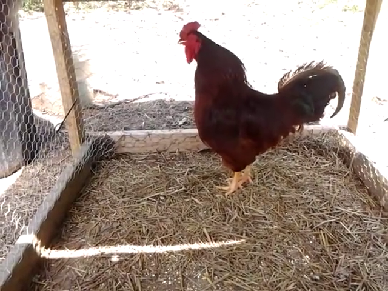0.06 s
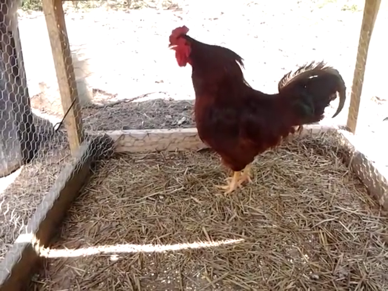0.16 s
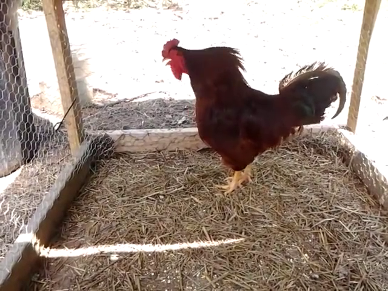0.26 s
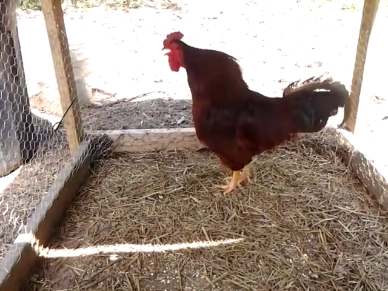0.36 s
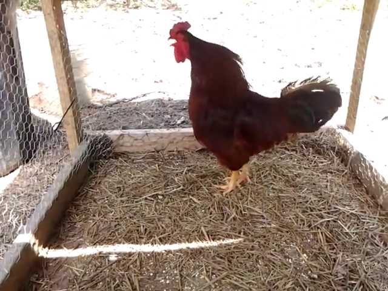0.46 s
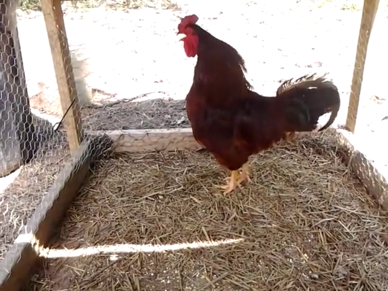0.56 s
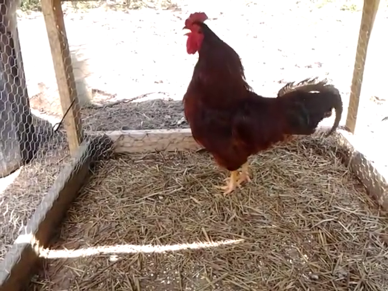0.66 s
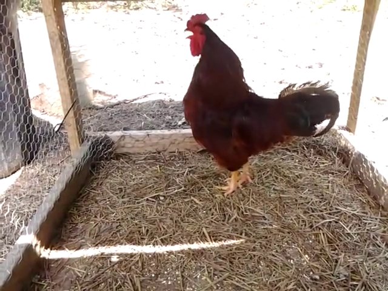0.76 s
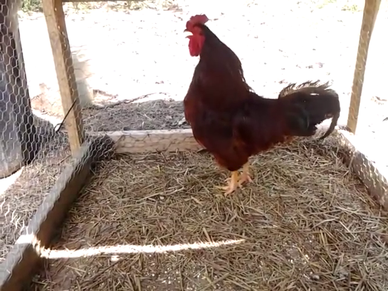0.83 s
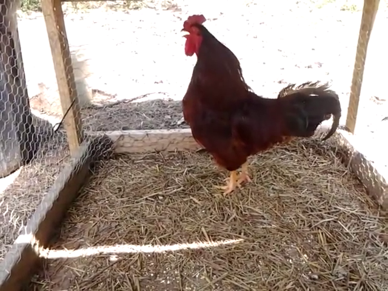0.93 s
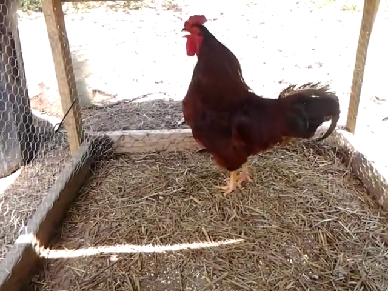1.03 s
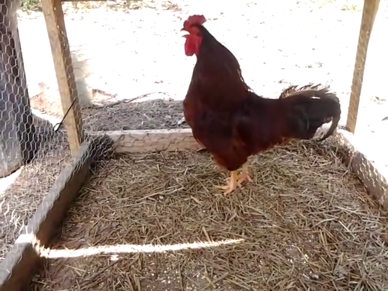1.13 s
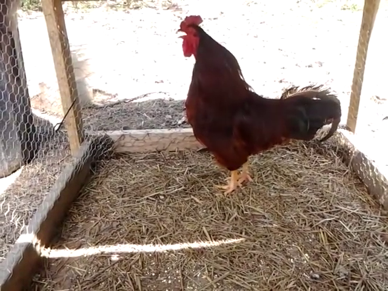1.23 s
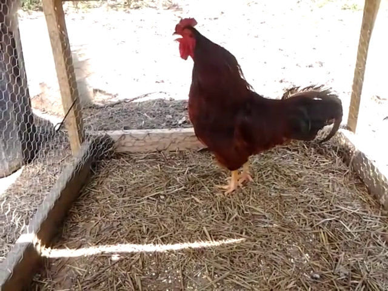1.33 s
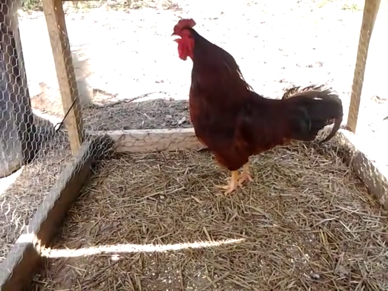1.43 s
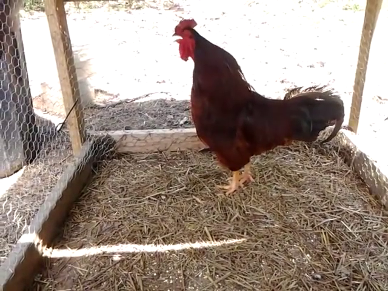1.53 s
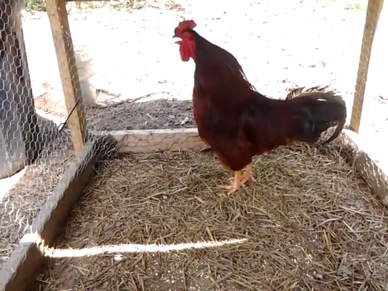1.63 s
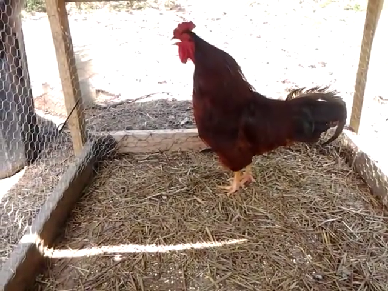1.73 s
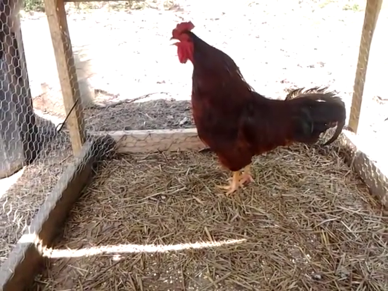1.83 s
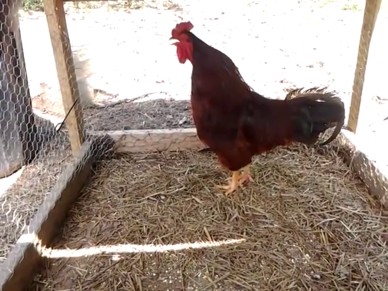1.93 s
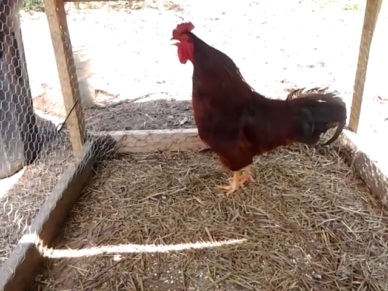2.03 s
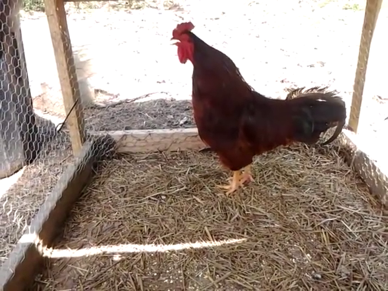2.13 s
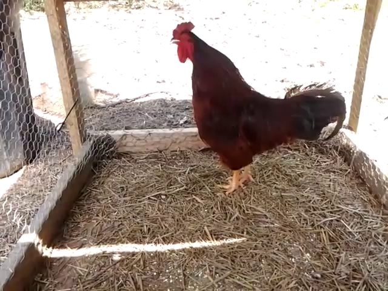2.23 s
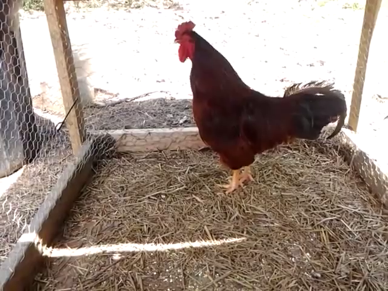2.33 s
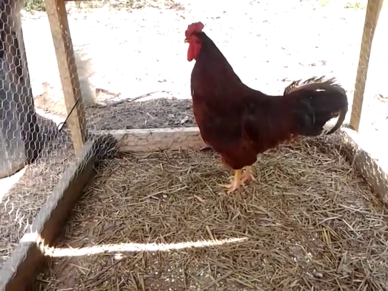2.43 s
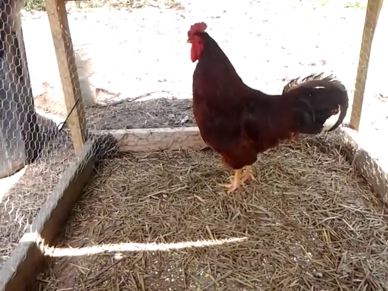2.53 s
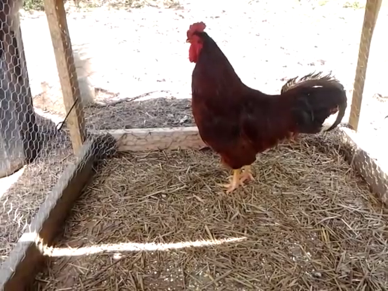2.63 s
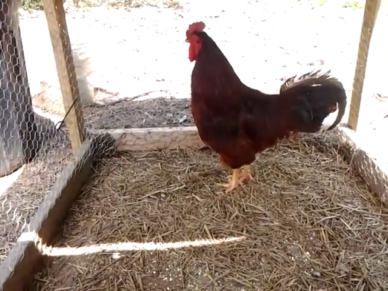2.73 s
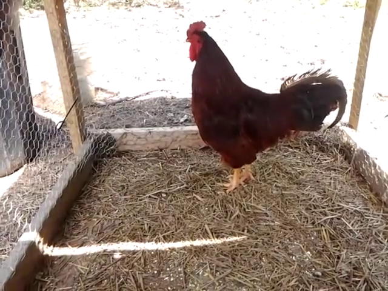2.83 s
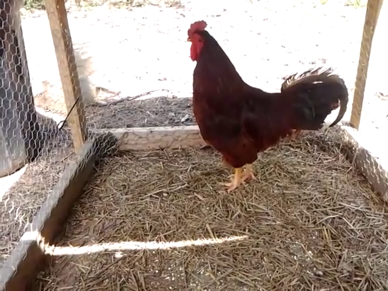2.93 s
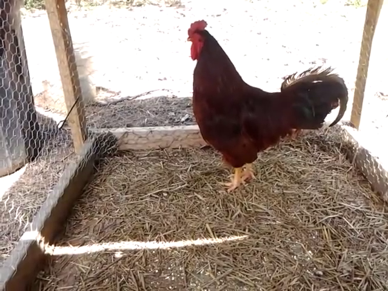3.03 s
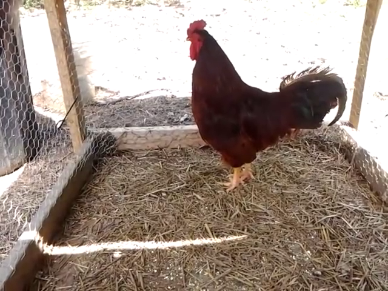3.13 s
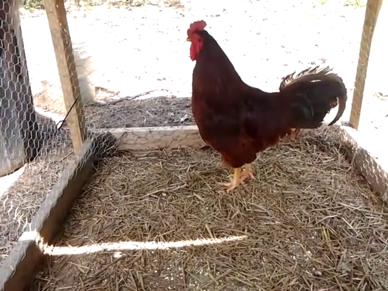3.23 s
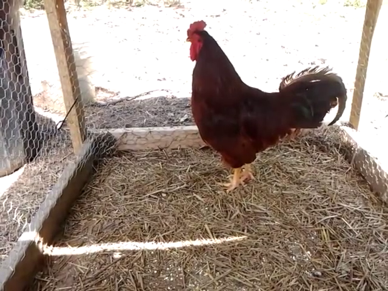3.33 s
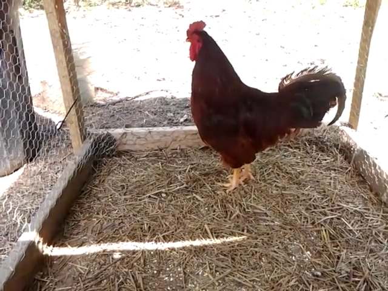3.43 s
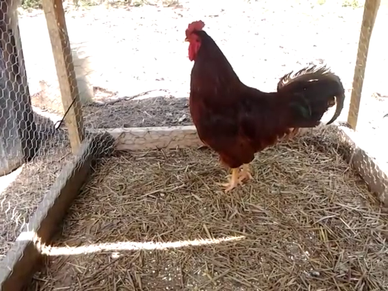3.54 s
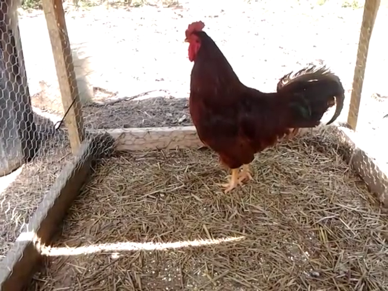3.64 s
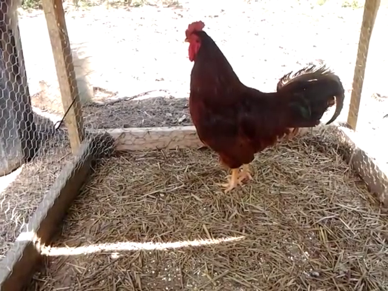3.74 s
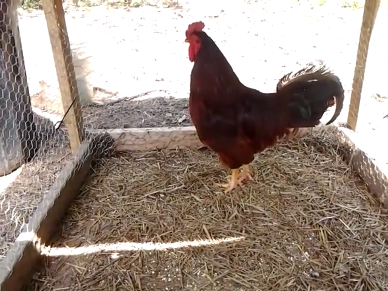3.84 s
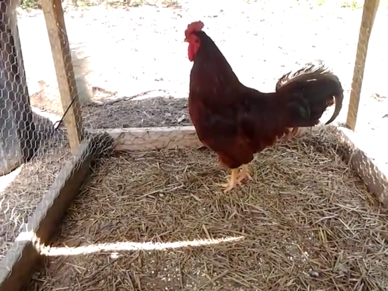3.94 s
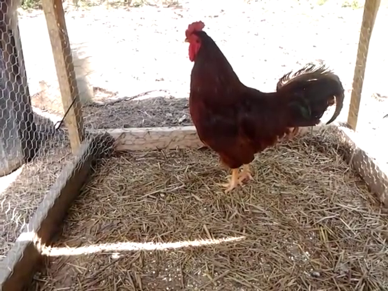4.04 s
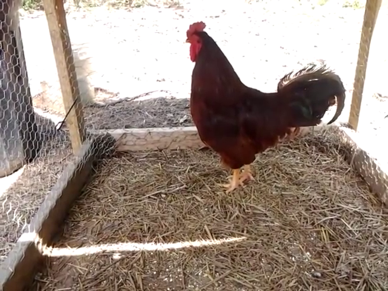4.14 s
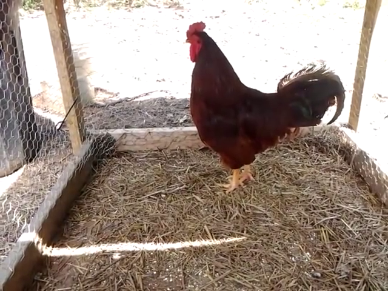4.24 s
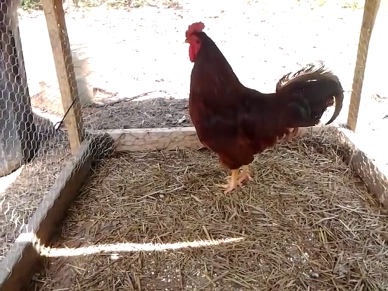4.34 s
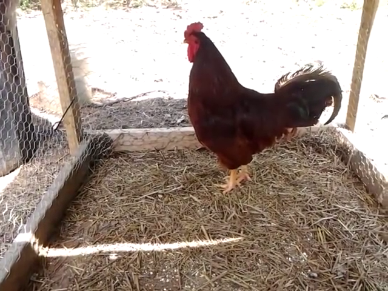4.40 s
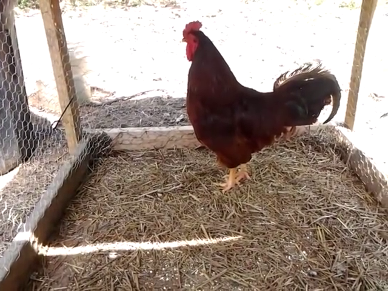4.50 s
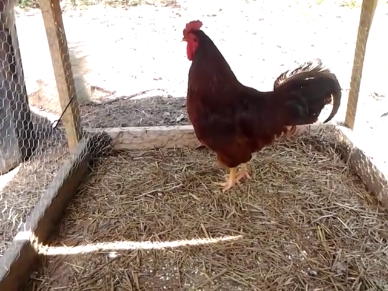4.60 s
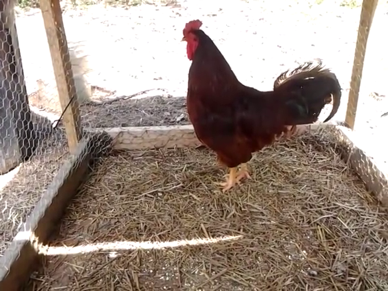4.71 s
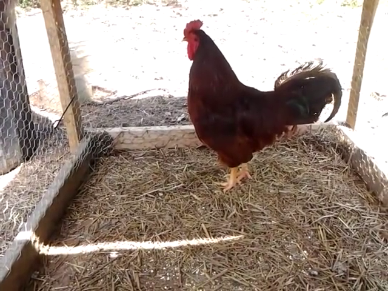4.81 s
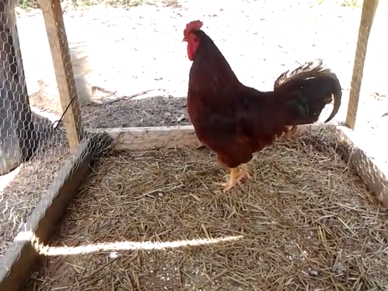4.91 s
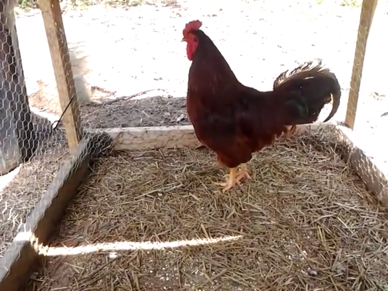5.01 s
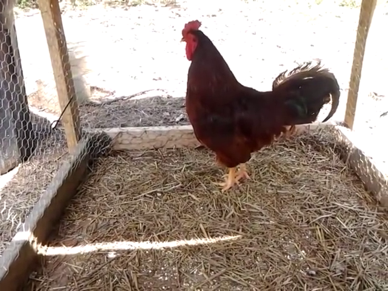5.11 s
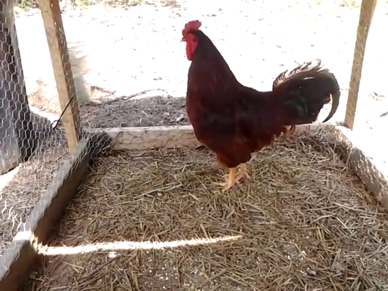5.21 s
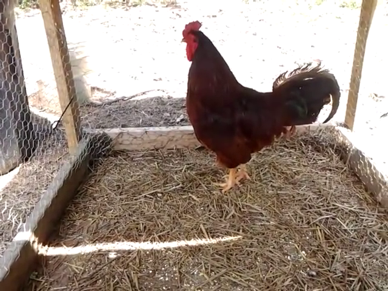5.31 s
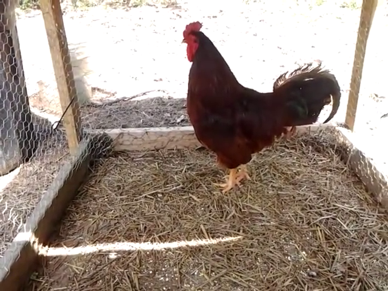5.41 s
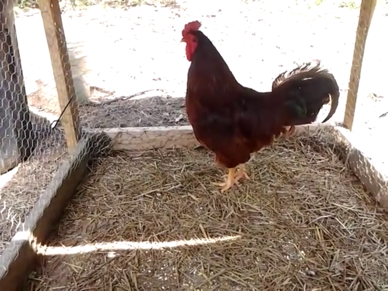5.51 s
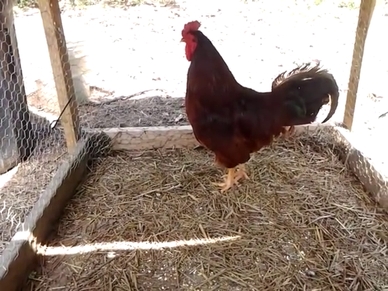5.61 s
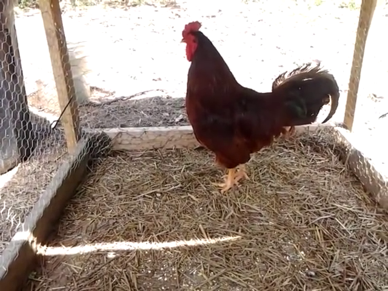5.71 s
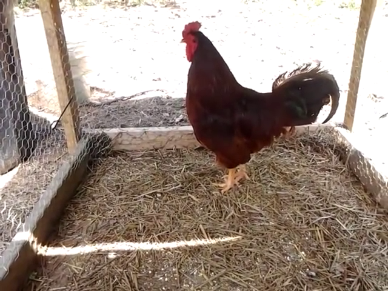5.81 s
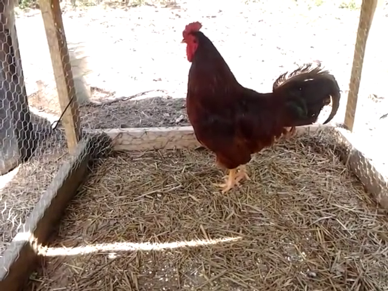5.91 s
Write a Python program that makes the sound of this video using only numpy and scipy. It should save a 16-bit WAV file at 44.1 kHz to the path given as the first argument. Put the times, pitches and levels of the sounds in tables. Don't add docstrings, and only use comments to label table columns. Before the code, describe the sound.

In a quiet outdoor pen, sparrows chirp and straw ticks before a close rooster gives one loud crow: a short hoarse note, a brief gap, a cracking rise, a rapid flutter and a long sinking note. Echoes fade into far whistles, chirps and faint clucks; later wings rustle softly and a crow caws three times. A small hissy microphone clips on the peaks.

```python
import sys
import numpy as np
from scipy import signal
from scipy.fft import rfft, irfft
from scipy.io import wavfile
from scipy.ndimage import uniform_filter1d

SR = 44100
rng = np.random.default_rng(int(sys.argv[2]) if len(sys.argv) > 2 else 0)


def generate_wav(sig):
    pcm = np.round(np.clip(np.atleast_2d(sig).T, -1, 1) * 32767).astype(np.int16)
    wavfile.write(sys.argv[1], SR, pcm)


def volts_from_db(level):
    exponent = np.asarray(level, float) / 20
    return 10 ** exponent


N = 262836


def evened(x):
    return x / np.sqrt(np.mean(x ** 2) + 1e-20)


def read(points, hz):
    f, value = np.transpose(points)
    return np.interp(np.log(hz + 1), np.log(f + 1), value)


def follow(t, rows):
    s, *columns = np.transpose(rows)
    return [np.interp(t, s, column) for column in columns]


def add(mix, s, sound):
    part = mix[round(s * SR):][:len(sound)]
    part += sound[:len(part)]


def drift(hz, step=1):
    lowpass = signal.butter(2, hz, fs=SR / step, output="sos")
    return evened(signal.sosfilt(lowpass, rng.standard_normal(N // step + 1)))


def response(modes, hz):
    return np.sqrt(sum((volts_from_db(db) / (1 + (1.7 * (hz - f) / w) ** 2) ** 1.5) ** 2 for f, w, db in modes))


def chaos(modes, lo_hz, hi_hz, beats):
    hz = np.fft.rfftfreq(N, 1 / SR)
    band = 1 / (1 + (lo_hz / (hz + 1)) ** 8) / (1 + (hz / hi_hz) ** 8)
    noise = beats * rng.standard_normal(N)
    return evened(irfft(rfft(noise) * response(modes, hz) * band, N))


# f/Hz, level/dB per Hz
AIR = [(12, -34), (20, -7), (48, -15.5), (157, -2.5), (268, -2), (398, -5), (574, -4.5), (1070, -8.5),
       (1680, -6.5), (2780, -9.5), (3910, -9), (5800, -16.5), (8600, -5.5), (10500, -10.5), (16900, -7.5)]
AIR_DB = -56.5
# t/s, level/dB
LULL = [(0, 0.5), (2.6, 2.5), (3.3, 0), (3.95, -1.5), (4.2, -0.5), (4.5, 0.5), (5.2, 2.5), (5.6, -3),
        (5.96, 2)]


def air():
    hop = 256
    frames, hz = N // hop + 5, np.fft.rfftfreq(1024, 1 / SR)
    a, b, patches = rng.standard_normal((frames, 513, 3)).T
    patches = evened(uniform_filter1d(uniform_filter1d(patches, 14, 0), 10, 1))
    at = np.arange(frames) * hop
    swell_db = .5 * np.interp(at, np.arange(N + 1), drift(4.7))
    patch_db = (.8 + 1.6 * (hz < 400))[:, None] * patches
    z = (a + 1j * b) * volts_from_db(read(AIR, hz)[:, None] + patch_db + swell_db + follow(at / SR, LULL)[0])
    return volts_from_db(AIR_DB) * evened(signal.istft(z, nperseg=1024, noverlap=768)[1][:N])


# f/Hz, t60/s
YARD = [(300, 0.5), (700, 0.4), (1300, 0.8), (2500, 1.1), (4500, 0.27), (10000, 0.32)]


def tail(x, gap_s):
    taps = np.zeros(SR)
    at = np.arange(round(gap_s * SR), SR - 20, 20)
    at = at + rng.integers(0, 20, len(at))
    taps[at] = rng.choice([-1., 1.], len(at))
    hz, t, z = signal.stft(taps, SR, nperseg=256)
    decay = volts_from_db(-60 * t / read(YARD, hz)[:, None])
    taps = signal.istft(z * decay, SR, nperseg=256)[1]
    return signal.fftconvolve(x, taps / np.linalg.norm(taps))[:N]


# f/Hz, width/Hz, level/dB
ECHO_COLOUR = [(670, 580, -18.5), (1400, 460, -5.5), (3900, 3100, -7), (6100, 600, -8.5),
               (8700, 1500, -2.5)]


def yard_echoes(bird, whistler, neighbours, caws):
    colour = response(ECHO_COLOUR, np.fft.rfftfreq(N, 1 / SR))
    thrown = irfft(rfft(np.roll(bird, round(0.128 * SR))) * colour, N)
    early = np.roll(thrown, -round(0.12 * SR))
    send = volts_from_db(-28.0) * thrown + volts_from_db(-36.0) * early
    send = send + volts_from_db(-4.5) * whistler + volts_from_db(-7.5) * neighbours + volts_from_db(-11.0) * caws
    echoes = tail(send, 0.014)
    return np.interp(np.arange(N) + 5 * drift(14)[:N], np.arange(N), echoes)


# t/s, level/dB
RUSTLE = [(4.25, -76), (4.35, -61), (4.503, -55), (4.656, -69), (4.684, -76), (4.694, -69), (4.719, -65)]


def rustle():
    s, db = np.transpose(RUSTLE)
    level_db = np.interp(np.arange(N) / SR, s, db, left=-120, right=-120) - 5.0
    return volts_from_db(level_db) * chaos([(3430, 670, 0)], 2500, 4400, 1)


# t/s, length/s, first f/Hz, level/dB
SPARROWS = [(0, 0.04, 4500, -67), (0.141, 0.04, 4700, -67), (0.315, 0.088, 4400, -58.5),
            (2.362, 0.051, 5080, -64), (2.482, 0.046, 4870, -61), (2.611, 0.024, 4625, -58),
            (2.687, 0.028, 3627, -66), (2.935, 0.051, 4950, -66.5), (3.065, 0.05, 4900, -64),
            (3.175, 0.04, 4100, -73), (3.289, 0.054, 4300, -68), (3.421, 0.028, 4470, -62.5),
            (3.473, 0.051, 4790, -64.5), (3.609, 0.0176, 4400, -61.5), (3.674, 0.054, 4130, -65),
            (3.795, 0.036, 4300, -64), (4.181, 0.037, 4850, -62), (4.292, 0.03, 4635, -65),
            (5.674, 0.022, 4300, -76), (5.77, 0.024, 4370, -65.5)]
SPARROW_FALL = 0.43
# t/s, length/s, f/Hz, level/dB
PEEPS = [(0.324, 0.18, 2515, -56), (2.44, 0.096, 3520, -61), (2.498, 0.17, 3675, -64),
         (2.522, 0.17, 4180, -66), (2.812, 0.03, 3960, -65), (3.158, 0.029, 3970, -63),
         (4.978, 0.015, 3660, -50.5), (4.978, .012, 4080, -49.5), (5.78, 0.031, 3100, -55.5),
         (3.779, 0.016, 4470, -60.5), (4.142, 0.038, 2323, -64.5), (4.327, 0.37, 4163, -62.5),
         (4.905, 0.053, 2960, -59.5), (4.921, 0.044, 3960, -58), (5.055, 0.037, 3117, -52.5)]
# t/s, length/s, level/dB
CLUCKS = [
    (.23, 0.072, -64),
    (2.59, 0.04, -54.5),
    (4.749, 0.0442, -66),
    (5.5, 0.056, -61),
]
CLUCK_HZ, CLUCK_TOP_HZ = 749, 970
# t/s, first note f/Hz, level/dB, wait/s
WHISTLES = [
    (2.368, 2710, -57.5, 0.053),
    (2.696, 2653, -53, .052),
    (2.995, 2542, -55, .052),
    (4.675, 1800, -62, .035),
]
NOTE_S, DROP_S, DROP_HZ, LAND_HZ = 0.048, 0.083, 2196, 1783


def chirps():
    rows = [(s, length, hz, SPARROW_FALL * hz, db) for s, length, hz, db in SPARROWS]
    rows += [(s, length, hz, hz, db) for s, length, hz, db in PEEPS]
    rows += [(s, length, CLUCK_HZ, CLUCK_TOP_HZ, db) for s, length, db in CLUCKS]
    rows += [(s, NOTE_S, hz, .97 * hz, db) for s, hz, db, wait in WHISTLES]
    rows += [(s + wait, DROP_S, DROP_HZ, LAND_HZ, db) for s, hz, db, wait in WHISTLES]
    return rows


def small_birds(lo_hz, hi_hz):
    out, waver = np.zeros(N), drift(150)
    for s, length, start_hz, end_hz, db in chirps():
        if not lo_hz < start_hz <= hi_hz:
            continue
        u = np.linspace(0, 1, round(length * SR))
        glide = start_hz + (end_hz - start_hz) * u ** 1.6
        glide = glide * (1 + 0.016 * waver[round(s * SR):][:len(u)])
        swell = np.sqrt(2) * np.sin(np.pi * u ** 0.6)
        add(out, s, volts_from_db(db) * swell * np.sin(2 * np.pi * np.cumsum(glide) / SR))
    return out


# t/s, length/s, top f/Hz, level/dB, swell from the start/dB
CAWS = [
    (4.306, 0.24, 807, -53, -2.5),
    (5.058, .24, 804, -46.5, 7.5),
    (5.771, 0.27, 813, -51, -5.5),
]
CAW_PARTIALS = [(2, -3), (3, -0.5), (4, -4.5), (5, -11.5), (6, -11.5)]
CAW_ARCH, CAW_SAG = .04, .03
CAW_SCATTER_DB, CAW_PATCHY_DB = 3.5, 1


def crow():
    out, wobble, rattle = np.zeros(N), drift(68), drift(33)
    patchy = volts_from_db(CAW_PATCHY_DB * drift(20))
    breath = chaos([(2320, 3200, 5.0), (3700, 1400, -5.0), (9790, 2000, 4)], 280, 12000, 1)
    for s, length, hz, db, swell_db in CAWS:
        u = np.linspace(0, 1, round(length * SR))
        at = np.minimum(round(s * SR) + np.arange(len(u)), N - 1)
        arch = 1 - CAW_ARCH * (1 - np.sin(np.pi * u ** .6)) + CAW_SAG * (.4 - u)
        phase = 2 * np.pi * np.cumsum(hz * arch * (1 + 0.012 * wobble[at])) / SR
        chop = 1 + .75 * np.cos(2 * np.pi * np.cumsum(115 * (1 + .13 * rattle[at])) / SR)
        partials = sum(volts_from_db(level_db + CAW_SCATTER_DB * drift(5.8)[at]) * np.cos(k * phase)
                       for k, level_db in CAW_PARTIALS)
        caw = evened((partials + 0.38 * breath[at]) * chop * patchy[at])
        add(out, s, volts_from_db(db - swell_db * (1 - u) ** 2) * caw * signal.windows.tukey(len(u), .3))
    return out


# t/s, level/dB
TICKS = [(0.2229, -46.5), (0.2493, -41), (0.2658, -35), (0.2982, -34), (3.6103, -43.5), (4.1411, -54),
         (4.9318, -51), (5.069, -46.5), (5.1728, -45), (5.4411, -57.5), (5.6686, -54)]
# t/s, level/dB
PUFFS = [
    (0.384, -44.5),
    (0.404, -42.5),
    (0.431, -44.5),
    (0.451, -45),
    (0.693, -32.5),
    (0.72, -34),
    (1.184, -39),
    (1.284, -26),
    (1.448, -45),
]


def close_noises():
    out, t = np.zeros(N), np.arange(2000) / SR
    for s, db in TICKS:
        add(out, s, volts_from_db(db - 60 * t / 0.0095) * np.sin(2 * np.pi * 8700 * t))
    for s, db in PUFFS:
        add(out, s, volts_from_db(db) * t / 0.013 * np.exp(1 - t / 0.0023))
    return out


# t/s, effort level/dB, strain/dB
OPENING = [
    [(.353, -25.5, -1), (.364, -13, -1.5), (.382, -11.5, -3.5), (.405, -9, -2), (.42, -16.5, 1),
     (.434, -6.5, 1.5), (.465, -9.5, 0), (.512, -11.5, -3.5), (.555, -42, -1)],
    [(.668, -20.5, -6), (.68, -17.5, -7.5), (.698, -11, -3.5), (.722, -8.5, -0.5), (.738, -13, -3),
     (.758, -8.5, -1.5), (.768, -15.5, -0.5), (.778, -8.5, 3), (.797, -16, 10)],
    [(.803, -7, -1), (.818, -6.5, 2.5), (.832, -4, 2.5), (.839, -10.5, -1), (.846, -10, -1),
     (.858, -13.5, -16.5), (.885, -19, -5), (.893, -28.5, -3)],
]
# t/s, effort level/dB, strain/dB
LONG_BREATH = [
    [(.897, -12, 2), (.902, -14.5, -3), (.916, -16.5, 2.5), (.924, -12, 2), (.938, -14, 1.5),
     (1.062, -13, 0.5), (1.19, -14.5, 0.5), (1.264, -15.5, 0), (1.31, -16, 4.5)],
    [(1.33, -11.5, -2), (1.364, -5, -1), (1.41, -6.5, 1.35), (1.45, -5.5, -0.4), (1.492, -7.5, -0.5),
     (1.59, -8, 0.05)],
    [(1.6, -7.5, -0.1), (1.7, -9, -0.58), (1.808, -8, 0.8), (1.938, -7.5, 0), (1.99, -8.5, 0)],
    [(2.004, -14.5, 2.5), (2.042, -14.5, 0.5), (2.15, -15, 3), (2.206, -14.5, 2), (2.24, -16.5, 1),
     (2.258, -16.5, -3.5), (2.286, -32.5, -1.5), (2.298, -43.5, -0.5), (2.325, -48.5, 4)],
]
# first partial level/dB, beak band level/dB
BALANCE = [
    (-22, -16),
    (-13.5, -16.5),
    (-27, -18),
    (-10, -18),
    (-18.5, -23),
    (-18.5, -20),
    (-11, -13),
]
THROB_DB = [1.1, 1.2, 1.8, 0, .3, .08, .4]
# hoarse start/s, hoarse end/s, chaos at the end/0-1, chaos in the body/0-1,
# strong-weak alternation/0-1
GRAIN = [
    (.059, .045, .3, .0012, .004),
    (.012, .01, .02, .005, .02),
    (0, .05, .3, .012, .13),
    (0, .05, .2, .075, .01),
    (0, .03, .0003, .0003, .045),
    (0, .07, .001, .0001, .007),
    (0, .075, .5, .001, .075),
]
PLAIN_DB, START_CHAOS, CLEAR_S = -10, .75, .015
FIRST_SLOPE, BEAK_SLOPE, BEAK_STRAIN = 0.72, 1.125, 0.69


def notes():
    levels, chaos_rows, uneven_rows = [], [], []
    for rows, balance, throb_db, grain in zip(OPENING + LONG_BREATH, BALANCE, THROB_DB, GRAIN):
        first_db, beak_db = balance
        start, end, last, body, uneven = grain
        s, effort_db, strain_db = np.transpose(rows)
        push = effort_db - PLAIN_DB
        first = first_db + FIRST_SLOPE * push - strain_db
        beak = beak_db + BEAK_SLOPE * push + BEAK_STRAIN * np.maximum(strain_db, -4.0)
        levels += zip(s, first, effort_db, beak, throb_db + 0 * s)
        clear, fray = s[0] + start + (start > 0) * CLEAR_S, s[-1] - end
        if start > 0:
            chaos_rows += [(s[0], START_CHAOS), (s[0] + start, START_CHAOS)]
        chaos_rows += [(clear, body), (fray, body), (min(fray + CLEAR_S, s[-1]), last), (s[-1], last)]
        uneven_rows += [(clear, uneven), (fray, uneven)]
    return sorted(levels), sorted(chaos_rows), sorted(uneven_rows)


# t/s, half width/s, windpipe level/dB, added chaos/0-1
SLIPS = [(.74, .012, 0, .04), (.75, .004, -8, .01), (.809, .004, -6, .01), (.799, .006, -7, .06),
         (.837, .004, -2, .03), (1.325, .012, -3, .06), (1.37, .035, -8, .004), (1.39, .012, -11, .004),
         (.891, .006, -10, 0), (1.413, .006, -5, .003), (1.438, .01, -6, .003), (2.19, .025, -3, .06),
         (2.232, .012, -1, .02)]


def slips(t, pipe_db, rough):
    for s, width, dip_db, fray in SLIPS:
        slip = np.maximum(1 - abs(t - s) / width, 0)
        pipe_db = pipe_db + dip_db * slip
        rough = np.clip(rough + fray * slip, 0, 1)
    return pipe_db, rough


def membrane(t, hz, uneven, beak):
    phase, coarse, coarse_hz = 2 * np.pi * np.cumsum(hz) / SR, t[::64], hz[::64]
    upper, power = np.zeros(len(t)), np.zeros(len(coarse))
    for k in np.arange(6, 54) / 2:
        scatter_db = (1.2 + .17 * k) * drift(11.0, step=64)[:len(coarse)]
        gain = response(beak, k * coarse_hz) * volts_from_db(scatter_db) * (k * coarse_hz < 17500)
        if k % 1:
            boost = np.maximum(np.clip((672 - coarse_hz) / 3, 2, 5), min(1.5 * k - 8, 11))
            gain = gain * np.minimum(boost * uneven[::64], .8)
        power = power + gain ** 2 / 2
        upper += np.interp(t, coarse, gain) * np.cos(k * phase + 2 * np.pi * rng.random())
    half = .4 * np.minimum(uneven, .15) ** 1.5 * np.where(hz > 900, 6, hz < 672)
    first = np.sqrt(2) * (np.exp(1j * phase) + half * np.exp(.5j * phase))
    sides = np.cos(1.5 * phase) + np.clip((668 - hz) / 12, .2, 1.6) * np.cos(2.5 * phase + 2)
    second = np.sqrt(2) * (np.cos(2 * phase + np.where(t > 1.34, 1.5, 0)) + uneven * sides)
    return phase, first, second, upper / np.interp(t, coarse, np.sqrt(power))


# t/s, turns done
FLUTTER = [(.909, 0), (.941, 1), (1.101, 6), (1.222, 10), (1.258, 11), (1.3, 11.8), (1.335, 11.85)]


def hand_overs(t, partner):
    turn = (follow(t, FLUTTER)[0] + .03 * drift(18)[:len(t)]) % 1
    fluttering = (t > .91) & (t < 1.335)
    swell = np.interp(turn, [0, .1, .35, .64, .87, 1], [0.87, 0, .1, 0.94, 0.98, 0.68])
    lead = uniform_filter1d(partner * np.where(fluttering, swell, 0), size=160)
    snap = fluttering * np.exp(-(np.minimum(turn, 1 - turn) / 0.07) ** 2)
    return turn, fluttering, lead, snap


# t/s, posture number
POSTURE = [(.6, 0), (.65, 1), (.88, 1), (.92, 2), (1.21, 2), (1.35, 3), (1.92, 3), (2.03, 4)]
BEAK = [(1880, 240, -30, -25.5, -29, -30, -3), (4030, 240, 2, -35.5, -38, -33.5, -33.5),
        (2156, 410, -17.5, -4.5, -6, -13, -6.5), (2814, 300, -15, -15.5, -10, -5, -6.5),
        (3073, 270, -25, -5.5, -5.5, -30, -37.5), (3805, 530, -10.5, -22.5, -28.5, -6.5, -0.5),
        (4300, 230, -10, -12, -7.5, -2.5, -19), (4696, 300, -2.5, -17, -20, -0.5, 3),
        (5130, 260, -3.5, -8, -5.5, -15.5, -32.5), (5570, 210, -22.5, -11, -15, -10.5, 4),
        (6033, 130, 3, -39, -41.5, -15, -4), (6620, 500, -14, -0.5, 0, -1.5, -8),
        (7650, 630, -9, 1.5, -4, -8, -3), (8310, 500, 3.5, 0, -4, -8.5, -1.5),
        (8910, 270, 2.5, -11.5, -18.5, 5.5, -1.5), (8800, 1900, -12, -21.5, -20, -3.5, -8.5),
        (10040, 720, -17.5, -18.5, -13.5, -5.5, -11.5), (11300, 480, -20, -22.5, -24, -23.5, -29.5),
        (12700, 1400, -22, -19, -18, -22.5, -25), (15500, 1500, -27, -23, -20, -24.5, -22)]


def beak_shape(t):
    place = follow(t, POSTURE)[0]
    posture = [np.maximum(1 - abs(place - k), 0) for k in range(5)]
    beak = [(f, w, sum(p[::64] * db for p, db in zip(posture, dbs))) for f, w, *dbs in BEAK]
    return posture, beak


# f/Hz, width/Hz, level/dB
WINDPIPE = [(530, 150, -9), (720, 160, -8), (1110, 120, 0), (1320, 130, -3), (1740, 150, -1)]
# f/Hz, width/Hz, level/dB
STRETCHED = [(1220, 560, -0.5), (1515, 50, -1), (1862, 390, -8.5)]


def hoarseness(t, posture, beats):
    low = chaos(WINDPIPE, 460, 950, beats)[:len(t)]
    relaxed = chaos(WINDPIPE, 1100, 1700, beats)[:len(t)]
    stretched = chaos(STRETCHED, 1700, 1900, beats)[:len(t)]
    rasp = np.where((t > .8) & (t < 1.335), stretched, relaxed)
    hiss = 0
    for k, weight in enumerate(posture):
        modes = [(f, w, dbs[k]) for f, w, *dbs in BEAK]
        hiss = hiss + np.sqrt(weight) * chaos(modes, 2000, 17000, beats)[:len(t)]
    return low, rasp, hiss


# t/s, level/dB under the beak band
SHEEN = [(.4, -17), (.52, -15), (.9, -25.5), (1.33, -24.5), (1.36, -12), (1.5, -16), (1.6, -24),
         (1.88, -23), (2.0, -17), (2.15, -16), (2.2, -10), (2.25, -11)]


def sheen(t, beats):
    modes = [(7000, 2600, -3.0), (9240, 1300, 1.0), (12500, 5000, -18.0)]
    return volts_from_db(follow(t, SHEEN)[0]) * chaos(modes, 6300, 17000, beats)[:len(t)]


# f/Hz, width/Hz, level/dB, from t/s, to t/s
HOLLOWS = [(3567, 300, -15.5, 1.2, 1.4), (3603, 500, -14.5, 1.3, 1.1), (1927, 340, -10.5, 1.97, 2.08),
           (1569, 200, -4.5, 2.08, 2.17), (3270, 390, -12.5, 1.3, 2.0), (3170, 260, -27.5, 2.02, 2.17),
           (5080, 120, -17.5, 2, 2.3), (6060, 200, -30, .74, 1.27), (6000, 260, -22, 1.34, 1.44),
           (4700, 300, -15, 1.35, 1.41), (3200, 300, -15, 1.35, 1.43), (4700, 500, -21, 0.78, .905),
           (2780, 200, -9.5, .72, 1.1)]


def hollowed(x):
    hz, t, z = signal.stft(x, SR, nperseg=512, noverlap=384)
    cut_db = 0
    for f, w, db, a, b in HOLLOWS:
        notch_db = db / (1 + (2 * (hz - f) / w) ** 4)
        cut_db = cut_db + np.outer(notch_db, np.clip(np.minimum(t - a, b - t) / .015, 0, 1))
    return signal.istft(z * volts_from_db(cut_db), SR, nperseg=512, noverlap=384)[1][:len(x)]


# t/s, half width/s, f/Hz, level/dB
CATCHES = [(0.401, .008, 1090, -13.5), (0.515, 0.0072, 1800, -26.5), (0.527, 0.013, 1090, -17.5),
           (0.686, 0.0096, 1131, -7.5), (.697, 0.0048, 1884, -16), (.78, 0.0026, 1260, -25.5),
           (.866, 0.0045, 1403, -18), (.878, 0.013, 1050, -20), (1.288, 0.0044, 1247, -14),
           (1.32, 0.0063, 1207, -19), (2.188, 0.0087, 1760, -18), (2.237, 0.0067, 1810, -22),
           (2.23, .014, 1530, -21.5), (2.261, 0.0052, 1300, -15), (2.266, 0.024, 1694, -20.5)]


def catches(t, jitter):
    out = np.zeros(len(t))
    for s, width, hz, db in CATCHES:
        ring = np.cos(2 * np.pi * np.cumsum(hz * jitter) / SR)
        out += volts_from_db(db) * np.sqrt(2) * np.exp(-((t - s) / width) ** 2) * ring
    return out


# t/s, f/Hz
TUNE = [
    [(.356, 500), (.39, 590), (.42, 650), (.44, 673), (.5, 681), (.515, 676), (.555, 695)],
    [(.668, 590), (.688, 600), (.694, 715), (.728, 733), (.738, 805), (.76, 818), (.78, 843), (.797, 885)],
    [(.803, 950), (.82, 966), (.835, 960), (.85, 800), (.875, 650)],
    [(.895, 660), (.92, 725), (1.325, 727)],
    [(1.34, 705.5), (1.37, 710.6), (1.42, 704), (1.58, 694)],
    [(1.66, 686), (1.74, 680.9), (1.82, 671.3), (1.96, 658.9)],
    [(2.0, 647.7), (2.11, 633.9), (2.165, 633.9), (2.185, 638.1), (2.21, 627), (2.24, 629.3), (2.275, 570),
     (2.325, 525)],
]
# t/s, f/Hz, strength/0-1
PARTNER = [(.828, 967, 0), (.84, 968, 1), (.885, 966, 1), (.9, 966, 0), (.91, 790, 0), (.925, 795, 1),
           (.96, 808, 1), (1.325, 812, 1), (1.335, 812, 0)]
# t/s, level/dB under the second partial
ALTERNATION = [(1.34, -29.5), (1.44, -20.5), (1.53, -26.5), (1.56, -41.5), (1.61, -43), (1.65, -32.5),
               (1.72, -46), (1.85, -51), (1.9, -40.5), (1.94, -32.5), (1.99, -28.5), (2.03, -18),
               (2.15, -18), (2.2, -12.5), (2.25, -12)]
BREATHS = [
    (.3555, .568),
    (.67, 2.34),
]
ATTACK_S, RELEASE_S = .004, .022


def rooster():
    t = np.arange(round(2.34 * SR)) / SR

    def wander(hz):
        return drift(hz)[:len(t)]

    levels, chaos_rows, uneven_rows = notes()
    first_db, pipe_db, beak_db, depth_db = follow(t, levels)
    rough, uneven = follow(t, chaos_rows)[0], follow(t, uneven_rows)[0]
    hz = follow(t, np.concatenate(TUNE))[0]
    partner_hz, partner = follow(t, PARTNER)
    uneven = np.where(t > 1.34, volts_from_db(follow(t, ALTERNATION)[0]), uneven)
    pipe_db, rough = slips(t, pipe_db, rough)
    turn, fluttering, lead, snap = hand_overs(t, partner)

    blur = np.where(fluttering | (t > 2), 3, np.where(abs(t - .74) < .07, 20, 7))
    fuzz = np.minimum(blur * rough, .9)
    rough = np.clip(rough + .2 * snap, 0, 1)
    jitter = 1 + .0008 * wander(30) + .008 * np.sqrt(fuzz) * wander(250) + .004 * fluttering * wander(40)
    posture, beak = beak_shape(t)
    phase, *one = membrane(t, hz * jitter, uneven, beak)
    _, *two = membrane(t, partner_hz * (1 + 0.0033 * wander(120)), uneven, beak)

    pull = 2 * np.pi * np.cumsum(lead * (partner_hz - hz) - 20 * snap * (turn < .5)) / SR
    first = volts_from_db(-5.0 * snap) * (one[0] * np.exp(1j * pull)).real
    first = first + volts_from_db(-11.5) * lead * one[0].real
    joined = np.where(fluttering, .9 * lead, .93 * partner)
    second, upper = (np.sqrt(1 - joined) * a + np.sqrt(joined) * b for a, b in zip(one[1:], two[1:]))

    ring = fluttering * partner * np.exp(-(np.minimum(turn + 0.1, abs(turn - .94)) / 0.12) ** 2)
    ring_phase = 2 * np.pi * np.cumsum((1150 + 200.0 * (t - 1)) * jitter) / SR
    second = second + volts_from_db(2.5 + 0.5 * wander(4)) * ring * np.cos(ring_phase)

    throb_db = depth_db * np.cos(2 * np.pi * 50.0 * (t - .435) + 4.5 * wander(17.0))
    pipe_db = pipe_db + throb_db + 1.5 * fluttering * wander(56)
    beak_db = beak_db + throb_db + 1.0 * (lead - .5) * fluttering + 1.3 * wander(28)
    beats = np.pad(1.7 + np.exp(2.0 * np.cos(phase)), (0, N - len(t)))
    low, rasp, hiss = hoarseness(t, posture, beats)
    low_share = np.where(fluttering, .04, .6) * rough ** 1.5 + .00004
    bands = [(first_db, first, low, low_share), (pipe_db, second, rasp, rough), (beak_db, upper, hiss, fuzz)]
    voice = volts_from_db(beak_db) * sheen(t, beats)
    for db, tone, noise, share in bands:
        voice = voice + volts_from_db(db) * (np.sqrt(1 - share) * tone + np.sqrt(share) * noise)

    sounding = sum(np.clip(np.minimum((t - a) / ATTACK_S, (b - t) / RELEASE_S), 0, 1) for a, b in BREATHS)
    highpass = signal.butter(4, 260, "high", fs=SR, output="sos")
    voice = signal.sosfilt(highpass, (hollowed(voice) + catches(t, jitter)) * sounding)
    return np.pad(voice, (0, N - len(t)))


# delay t/s, level/dB
PEN = [(.004, -34), (.011, -20.5), (.024, -29.5), (.031, -35)]


def scene():
    bird, caws = rooster(), crow()
    whistler = small_birds(1500, 2800)
    neighbours = small_birds(0, 1500) + small_birds(2800, 6000)
    near = bird.copy()
    for delay_s, db in PEN:
        add(near, delay_s, volts_from_db(db) * bird)
    echoes = yard_echoes(bird, whistler, neighbours, caws)
    return (near + whistler + neighbours + caws + echoes + rustle() + close_noises() + air())[None]


def band_limit(x):
    return signal.sosfilt(signal.butter(12, 17080, fs=SR, output="sos"), x)


def record(dry):
    clipped = np.clip(dry, -.99, .99)
    return band_limit(clipped)


dry = scene()
out = record(dry)
generate_wav(out)
```